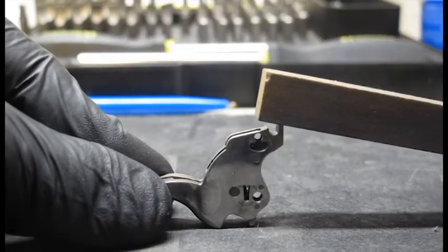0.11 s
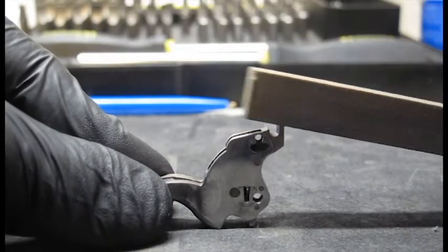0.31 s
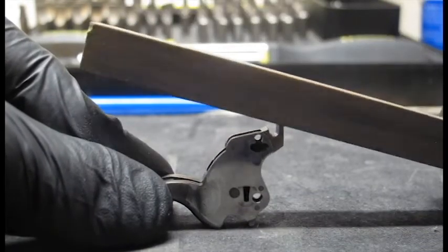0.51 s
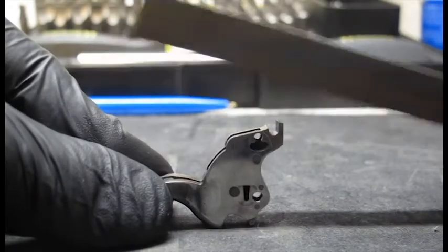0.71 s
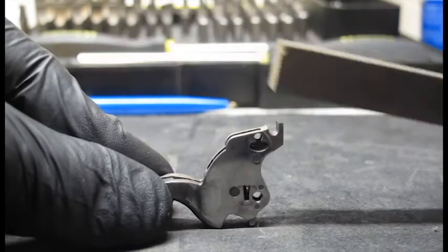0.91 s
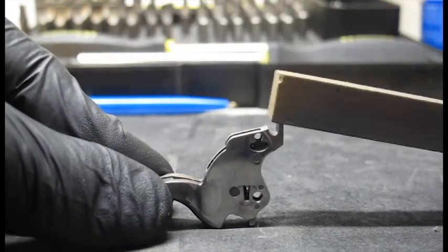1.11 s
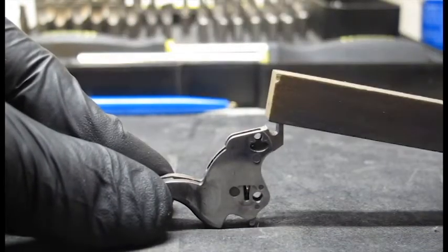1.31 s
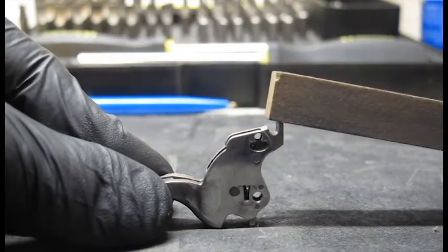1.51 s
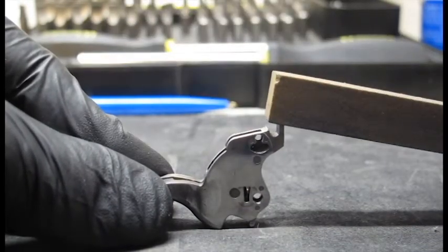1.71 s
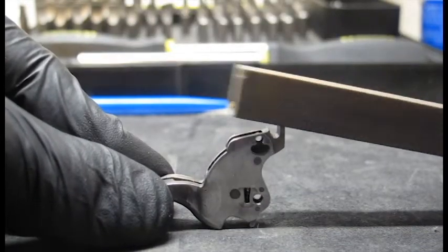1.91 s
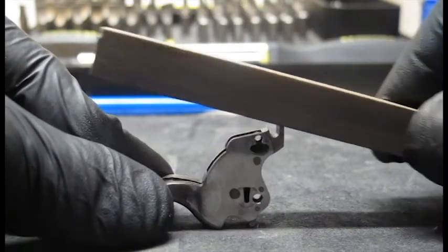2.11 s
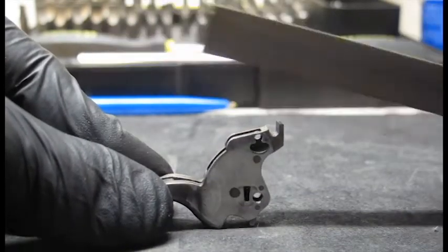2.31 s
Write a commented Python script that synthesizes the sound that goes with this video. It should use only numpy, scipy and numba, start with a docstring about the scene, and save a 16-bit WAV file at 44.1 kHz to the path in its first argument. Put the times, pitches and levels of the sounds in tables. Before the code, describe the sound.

Two short, gritty scrapes of a sharpening stone across a small steel part, each about a third of a second, separated by a bright click and light nudges; close microphone, quiet workshop with hum and hiss.

```python
"""First a quiet workshop is heard: mains hum, rumble, hiss, a soft tap and a faint tick.
Then a sharpening stone is pushed twice across the tip of a small steel part on a bench mat, close to a camera.
Random grit clicks chatter over the steel and ring the part, the stone and the bench top.
Short bursts of noise make the taps and nudges of the stone.
Short echoes follow, and the right microphone port favours the shrill treble."""
import sys
import numpy as np
from scipy import signal
from scipy.fft import rfft, irfft
from scipy.io import wavfile
from scipy.ndimage import uniform_filter1d
from numba import njit

SR = 44100
rng = np.random.default_rng(int(sys.argv[2]) if len(sys.argv) > 2 else 0)


def gain_from_decibels(decibels):
    """Convert decibel values to linear amplitude factors."""
    exponent = np.asarray(decibels, float) / 20
    return 10 ** exponent


def dump(signal):
    """Clip the signal to [-1, 1] and save it as 16-bit WAV at the path in sys.argv[1]."""
    limited = np.clip(np.atleast_2d(signal).T, -1, 1)
    pcm = np.round(limited * 32767).astype(np.int16)
    wavfile.write(sys.argv[1], SR, pcm)


N = 105840
T = np.arange(N) / SR  # time of every sample in seconds

# The two strokes, a list of moments each. Columns: t/s, drive of stone rasp level/dB,
# drive of the part's shrill ring level/dB, bench rocking level/dB, drive of bench boom level/dB,
# drive of bench knock level/dB, low stone resonance f/Hz, high stone resonance f/Hz,
# chatter depth level/dB, centre of the shrill ring f/Hz
STROKE_PATHS = [
    [(0.2, -94.5, -101, -40, -54.5, -66, 2460, 4200, 2.3, 7350),
     (0.222, -64, -75, -39.5, -40, -41, 2460, 4240, 2.9, 7040),
     (0.238, -52, -61.5, -24.5, -34, -42, 2380, 4130, 3.5, 7300),
     (0.262, -45, -45, -28.5, -22.5, -46, 2220, 4100, 3.4, 6900),
     (0.276, -42, -50.5, -16.5, -30.5, -35, 2200, 4220, 3.3, 7060),
     (0.308, -41.5, -51.5, -31.5, -40.5, -34.5, 2230, 4100, 4.8, 7150),
     (0.32, -37.5, -55, -51, -25.5, -40, 2220, 4100, 1.5, 7400),
     (0.346, -38, -38.5, -25, -24, -29.5, 2380, 4100, 2.6, 7360),
     (0.378, -40.5, -30.5, -39.5, -23, -38, 2430, 3680, 1.7, 7500),
     (0.394, -35.5, -34, -41.5, -18, -28, 2480, 3450, 1.8, 7440),
     (0.414, -37.5, -30, -22, -35.5, -26.5, 2860, 3460, 2, 7590),
     (0.458, -35.5, -40.5, -27, -18, -40, 3320, 3430, 3.44, 7460),
     (0.468, -43, -68, -21.5, -42.5, -36, 3030, 3430, 2.1, 7400),
     (0.49, -60.5, -75, -36.5, -34, -50, 3200, 3470, 5, 7470)],
    [(1.808, -56.5, -57, -35, -46, -36.5, 2280, 4420, 5, 7400),
     (1.814, -58, -59.5, -22.5, -32, -37, 2130, 4800, 8, 7260),
     (1.84, -40, -44, -29.5, -24, -31.5, 2270, 4400, 1.5, 7450),
     (1.874, -34, -41.5, -33.5, -20.5, -30, 2370, 4360, 2.04, 7360),
     (1.904, -36, -45.5, -35, -23.5, -29, 2490, 4300, 2.8, 7100),
     (1.922, -33, -45.5, -77, -29.5, -30.5, 2230, 4200, 1.4, 7200),
     (1.956, -36.5, -36, -16, -22, -27, 2470, 4070, 3.8, 7470),
     (1.982, -41, -39.5, -32, -21.5, -30.5, 2840, 3950, 4.4, 7540),
     (2.008, -37.5, -37, -38.5, -23.5, -25.5, 2700, 3900, 2.2, 7570),
     (2.026, -34.5, -38.5, -37, -23.5, -28.5, 2900, 3560, 1.4, 7400),
     (2.085, -33.5, -41.5, -20, -26.5, -37, 2900, 4000, 1.6, 7620),
     (2.091, -73, -55, -29, -29, -46.5, 2790, 4460, 6.8, 7400)],
]
# Taps and nudges. Columns: t/s, then how hard each is driven: stone level/dB, stone ping level/dB,
# part level/dB, bench boom level/dB, bench knock level/dB; last, fading time of the contact t/s
STONE_TAPS = [(0, -62, -80, -62, -46, -56, .004), (.184, -62, -80, -64, -45, -50, .004),
              (.2075, -46, -80, -47, -60, -62, .006), (.231, -44, -80, -38, -60, -60, .004),
              (.632, -49, -46, -47, -64, -45, .008), (1.0277, -16, -27, -10, -34, -38, .0015),
              (1.036, -41, -58, -47, -50, -54, .022), (1.095, -64, -70, -66, -51, -70, .005),
              (1.2, -58, -80, -62, -66, -68, .025), (1.513, -43, -50, -58, -60, -58, .004),
              (1.5215, -46, -44, -36, -60, -58, .008), (1.549, -45, -62, -54, -60, -55, .008),
              (1.588, -49, -66, -60, -56, -54, .006), (1.7115, -28, -70, -30, -43, -40, .0015),
              (1.758, -48, -64, -60, -43, -43, .008), (1.765, -48, -80, -46, -60, -60, .004),
              (1.799, -47, -80, -39, -50, -50, .004), (2.14, -44, -46, -54, -52, -44, .007)]
# Moments when the stone skips off the edge late in a stroke. Columns: start t/s, length t/s
EDGE_SKIPS = [(.4325, .0045), (.443, .004), (.453, .004), (.462, .004), (2.055, .006), (2.071, .004),
              (2.079, .004)]

# Ringing tones of each body. Columns: f/Hz, relative level/dB, time to fade by 60 dB t/s
BENCH_BOOM_MODES = [(129.4, -20, 1), (168.1, -4.5, 0.2), (193.5, -5.5, 0.21), (270, -0.5, 0.13),
                    (335, -8, 0.11), (405.7, -4.5, 0.082)]
BENCH_KNOCK_MODES = [(650.9, 1, 0.091), (723.7, -2.5, 0.068), (950.5, -3.5, 0.028)]
STONE_MODES = [(1750, -6, .012), (2300, -5, .015), (3100, -3, .012), (3900, -3, .01), (4400, -4, .01),
               (5500, -3, .012), (6100, -4, .012)]
PART_MODES = [(6940, -10, .01), (7230, -4, .014), (7250, -26, .1), (7350, -22, .11), (7420, 0, .014),
              (7750, -7, .008)]
STONE_PING_MODES = [(2800, 0, .05), (2940, -2, .04)]
TICK_MODES = [(1060, 3.5, 0.024), (1770, -3, 0.07)]

# Left microphone port compared with the right. Columns: f/Hz, level/dB
PORT_LEVELS = [(60, 1), (1500, .5), (4200, -1), (5500, -6), (6800, -14), (8500, -14), (11700, -8)]
# Left port phase compared with the right. Columns: f/Hz, phase/rad
PORT_PHASES = [(100, 0), (1000, -.2), (2800, -.8), (4200, -1.4), (5400, -2.6), (11000, -2.6)]
# Mains hum tones. Columns: f/Hz, rms level/dB
HUM_TONES = [(50, -70), (100, -53), (200, -72), (400, -78)]
# Tone colour of the workshop hiss. Columns: f/Hz, relative level/dB
HISS_COLOUR = [(25, 0), (120, 11), (250, 14), (350, 11), (600, 6), (1200, 4), (7200, 3), (8500, -2),
               (10000, -10), (12000, -12)]

GRIT_PER_S, GRIT_SPREAD_DB = 7500, 2.3  # clicks per second; average random boost of a click
ROCK_HZ, ROCK_JITTER = 120.35, 0.037  # jitter: spread of the pitch, as a natural log
CHATTER_HZ, CHATTER_JITTER = 232, .35
ROCK_BITE_DB = 3.5  # the grit bites harder on each upswing of the bench
LIFT_S, BENCH_TAIL_S = .012, .17  # fades of the grit and of the bench around a stroke
ROOM_DB, ROOM_T60_S = -17, .25  # echo levels are before the bass cut
BENCH_ECHO_DB, BENCH_ECHO_S = -9, .01
HISS_DB, HISS_RISE_DB_PER_S, RUMBLE_DB = -61, 3.2, -63  # the hiss level is at the start


def strokes():
    """Chattering grit drives stone, part and bench; the driving levels and pitches move along each push."""
    rows = np.vstack([closed(stroke) for stroke in STROKE_PATHS])
    tracks = [np.interp(T, rows[:, 0], rows[:, k]) for k in range(1, 10)]
    rasp_db, part_db, rock_db, boom_db, knock_db, low_hz, high_hz, depth_db, shrill_hz = tracks
    swing = wobble(ROCK_HZ, ROCK_JITTER, hold=1300)
    contact = grip(depth_db, swing)
    scratch = grit() * contact
    rasp = stone_rasp(scratch * gain_from_decibels(rasp_db), contact * gain_from_decibels(rasp_db), low_hz, high_hz)
    shrill = part_shrill(scratch * gain_from_decibels(part_db), shrill_hz)
    rock = np.sqrt(2) * gain_from_decibels(rock_db) * swing
    boom = ring(grit() * gain_from_decibels(boom_db), BENCH_BOOM_MODES[1:])
    knock = ring(grit() * gain_from_decibels(knock_db), BENCH_KNOCK_MODES)
    return rasp + shrill + rock + boom + knock


def closed(stroke):
    """Silence around a stroke: the grit stops at lift-off, the bench dies away later."""
    first, last = list(stroke[0]), list(stroke[-1])
    before = [first[0] - LIFT_S, -130, -130] + [-90] * 3 + first[6:]
    lifted = [last[0] + LIFT_S, -130, -130] + last[3:]
    bench_still = [last[0] + BENCH_TAIL_S, -130, -130] + [-90] * 3 + last[6:]
    return np.vstack([before, stroke, lifted, bench_still])


def grip(depth_db, swing):
    """How firmly stone meets steel: it pulses with chatter and rocking, and nearly lets go in skips."""
    chatter = wobble(CHATTER_HZ, CHATTER_JITTER, hold=200)
    contact = gain_from_decibels(depth_db * (chatter + 1.5) + ROCK_BITE_DB * swing)
    for start, length in EDGE_SKIPS:
        half = length / 2
        contact = contact * (1 - .95 * np.exp(-((T - start - half) / half) ** 4))
    return contact


def grit():
    """Dense abrasive clicks of random timing, sign and size, with an rms of 1."""
    when, sign, size = rng.random((3, N))
    hits = when < GRIT_PER_S / SR
    clicks = hits * np.sign(sign - .5) * gain_from_decibels(-GRIT_SPREAD_DB * np.log(1 - size))
    return clicks / np.sqrt(np.mean(clicks ** 2))


def stone_rasp(scratch, pressure, low_hz, high_hz):
    """The stone's two resonances move as it slides, over broad grit noise and fixed ringing tones."""
    moving = 4.08 * svf(scratch, low_hz, 400.) - 4.4 * svf(scratch, high_hz, 900.)
    broad = gain_from_decibels(2) * svf(grit() * pressure, np.full(N, 2600.), 5000.)
    return moving + broad + .25 * ring(scratch, STONE_MODES)


def part_shrill(scratch, shrill_hz):
    """The steel part rings at fixed tones and in a narrow shrill band that moves."""
    band = svf(svf(scratch, shrill_hz, 740.), shrill_hz, 1210.)
    return .15 * ring(scratch, PART_MODES) + 12.75 * band


def taps():
    """Each contact is a short burst of noise that shakes the stone, the part and the bench."""
    drive, noise = np.zeros((5, N)), rng.standard_normal(N)
    for start, *levels_db, contact_s in STONE_TAPS:
        age = np.clip(T - start, 0, 1)
        burst = (1 - np.exp(-age / .0006)) * np.exp(-age / contact_s) * noise
        drive += gain_from_decibels(levels_db)[:, None] * burst
    on_stone, on_ping, on_part, on_boom, on_knock = drive
    stone = 2.2 * svf(on_stone, np.full(N, 3400.), 5000.) + .25 * ring(on_stone, STONE_MODES)
    ping = 1.2 * ring(on_ping, STONE_PING_MODES)
    part = 1.5 * ring(on_part, PART_MODES)
    bench = 4 * ring(on_boom, BENCH_BOOM_MODES) + 2.5 * ring(on_knock, BENCH_KNOCK_MODES)
    return stone + ping + part + bench


def tick():
    """A faint tick of some small object further off: one click rings two tones."""
    click = np.arange(N) == int(.092 * SR)  # at 0.092 s
    return ring(8 * gain_from_decibels(-49.5) * click, TICK_MODES)


def ports(x):
    """The two microphone ports differ in level and phase by frequency."""
    hz = np.fft.rfftfreq(N, 1 / SR)
    # each port takes half of the difference, in opposite directions
    half = gain_from_decibels(on_log_hz(PORT_LEVELS, hz) / 2) * np.exp(.5j * on_log_hz(PORT_PHASES, hz))
    both = np.abs(half + 1 / half).clip(1.2)
    return irfft(2 * rfft(x) * np.array([half, 1 / half]) / both, N)


def room(x):
    """Quick echoes off bench and tools and a longer tail, both bass-light and different at each port."""
    t = T[:SR // 2]
    tail = 0
    for db, t60 in (ROOM_DB, ROOM_T60_S), (BENCH_ECHO_DB, BENCH_ECHO_S):
        fade = gain_from_decibels(-60 * t / t60) * (t > .001)  # no echo in the first millisecond
        tail = tail + gain_from_decibels(db) * rng.standard_normal((2, len(t))) * fade / np.sqrt(np.sum(fade ** 2))
    tail = signal.sosfilt(signal.butter(2, 1500, "high", fs=SR, output="sos"), tail)
    return signal.fftconvolve(x, tail, axes=1)[:, :N]


def workshop():
    """Mains hum, low rumble and a slowly growing hiss; filtered noise, nearly alike left and right in the bass."""
    hz = np.fft.rfftfreq(N, 1 / SR)
    mid, side, low = rfft(rng.standard_normal((3, N)))
    spread = np.clip(hz / 2500, .25, 1) * side * np.array([[1], [-1]])  # opposite left and right
    hiss = irfft(gain_from_decibels(on_log_hz(HISS_COLOUR, hz)) * (mid + spread), N)
    hiss = hiss * gain_from_decibels(HISS_DB + HISS_RISE_DB_PER_S * T) / hiss.std()
    rumble = irfft(low * hz ** 2 / (40 ** 2 + hz ** 2) / (1 + (hz / 65) ** 4), N)
    rumble = rumble * gain_from_decibels(RUMBLE_DB) / rumble.std()
    hum = sum(np.sqrt(2) * gain_from_decibels(db) * np.sin(2 * np.pi * f * T + k) for k, (f, db) in enumerate(HUM_TONES))
    return hiss + rumble + hum


def ring(x, modes):
    """Let x strike a body: each tone is a fading sine, all scaled together to unit energy."""
    t = T[:SR // 3]
    body = 0
    for k, (hz, db, t60) in enumerate(modes):
        body = body + (-1) ** k * gain_from_decibels(db - 60 * t / t60) * np.sin(2 * np.pi * hz * t)
    return signal.fftconvolve(x, body / np.sqrt(np.sum(body ** 2)))[:N]


@njit
def svf(x, hz, width):
    """Band-pass filter with a moving centre hz and a bandwidth in Hz."""
    y, band, low = np.empty(len(x)), 0., 0.
    for i in range(len(x)):
        g, k = np.tan(np.pi * hz[i] / SR), width / hz[i]
        v = (band + g * (x[i] - low)) / (1 + g * (g + k))
        band, low, y[i] = 2 * v - band, low + 2 * g * v, k * v
    return y


def wobble(hz, jitter, hold):
    """A sine whose pitch wanders, heading for a new random pitch every hold samples."""
    steps = np.repeat(rng.standard_normal(N // hold + 1), hold)
    wander = uniform_filter1d(steps, size=hold)[:N]
    return np.sin(2 * np.pi * np.cumsum(hz * np.exp(jitter * wander)) / SR)


def on_log_hz(table, hz):
    """Read an (f/Hz, value) table on a log-frequency axis."""
    a = np.array(table, float)
    return np.interp(np.log(hz + 1), np.log(a[:, 0] + 1), a[:, 1])


def scene():
    """The contacts and the tick reach both ports directly and by echoes, over the workshop."""
    treble_cut = signal.butter(8, 8300, fs=SR, output="sos")
    bass_cut = signal.butter(4, 85, "high", fs=SR, output="sos")
    contacts = strokes() + taps() + tick()
    near = ports(signal.sosfilt(np.vstack([treble_cut, bass_cut]), contacts))
    return near + room(near + .4 * near[::-1]) + workshop()  # echoes mix in the other port


def low_pass(x):
    """Removes everything above the highest recorded frequency."""
    return signal.sosfilt(signal.butter(12, 12300, fs=SR, output="sos"), x)


def record(dry):
    """The camera rounds the peaks and cuts the top."""
    rounded = np.tanh(1.1 * dry) / 1.1
    top_cut = signal.ellip(8, .2, 60, 11100, fs=SR, output="sos")  # cut above 11100 Hz
    mix = signal.sosfilt(top_cut, rounded)
    return low_pass(mix)


dry = scene()
out = record(dry)
dump(out)
```